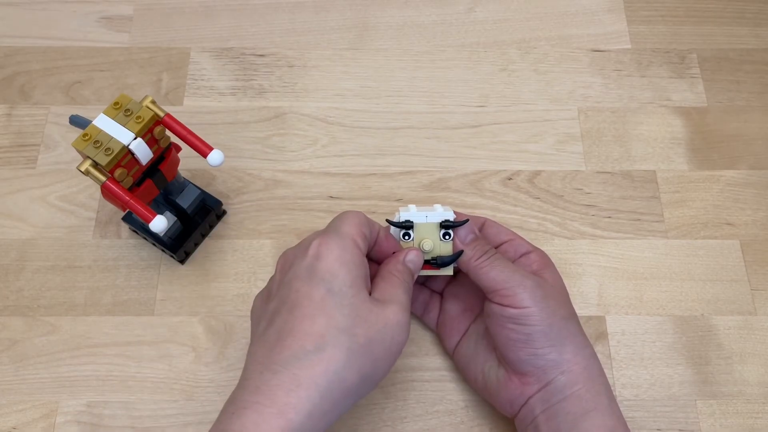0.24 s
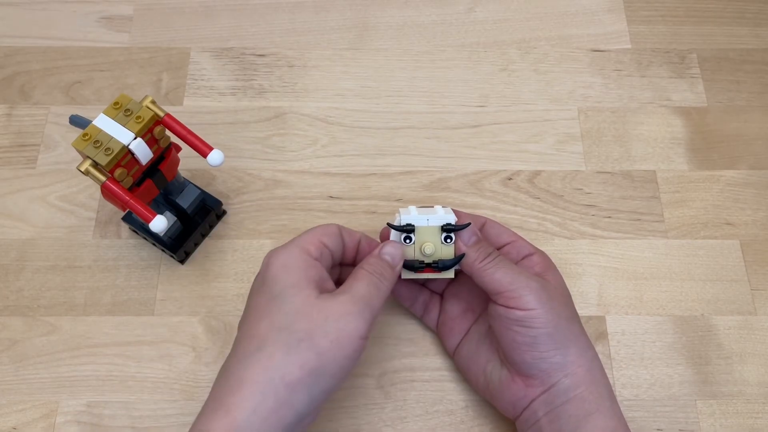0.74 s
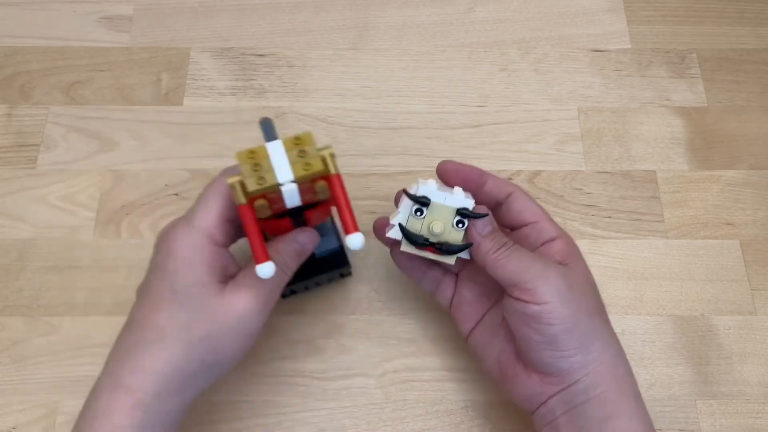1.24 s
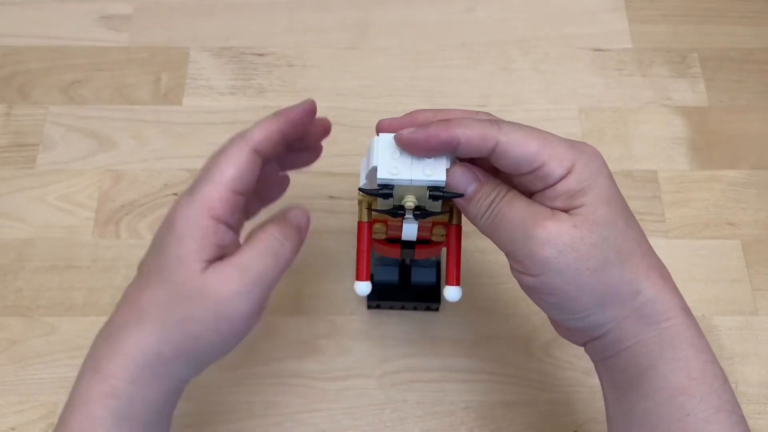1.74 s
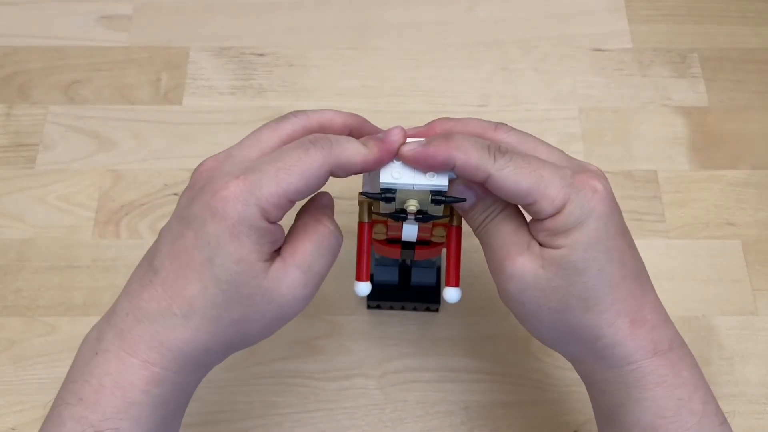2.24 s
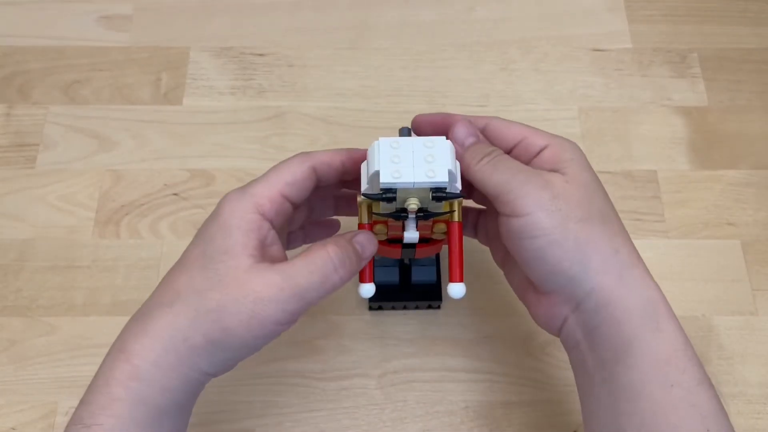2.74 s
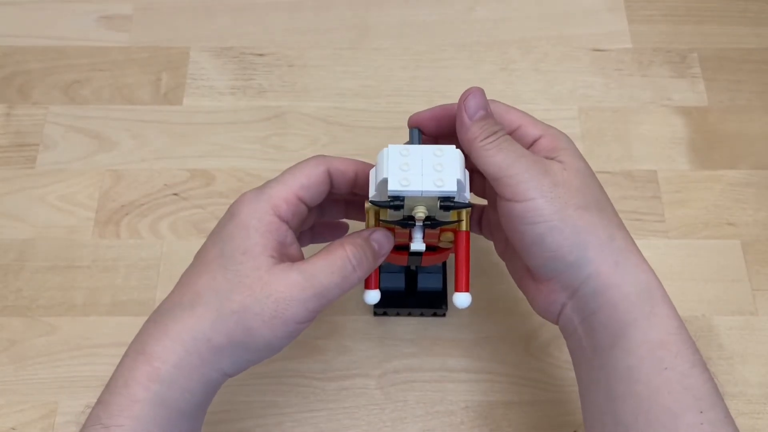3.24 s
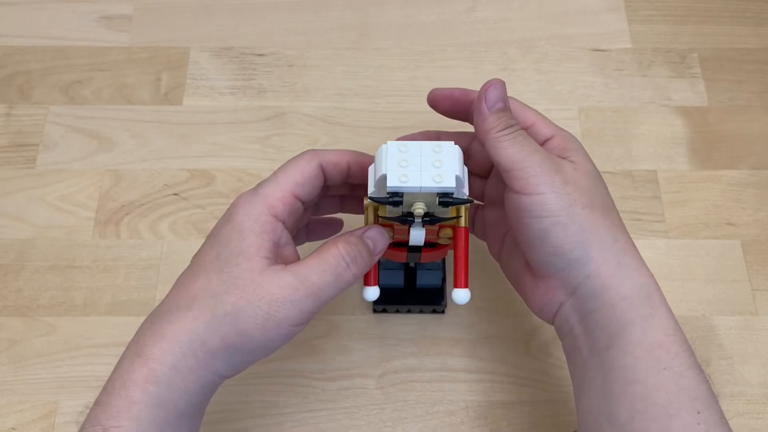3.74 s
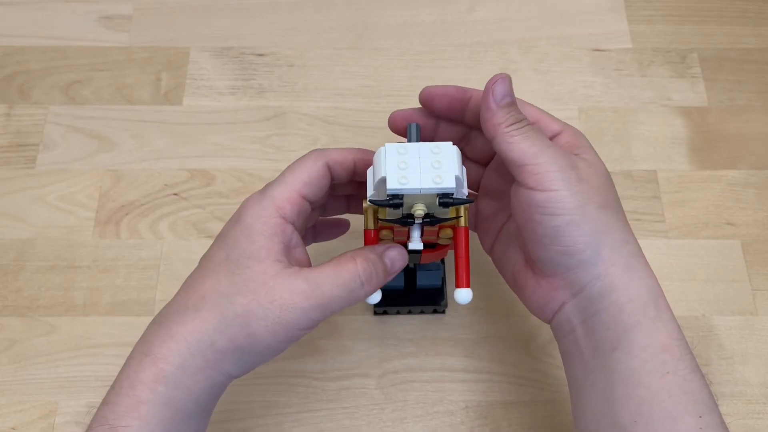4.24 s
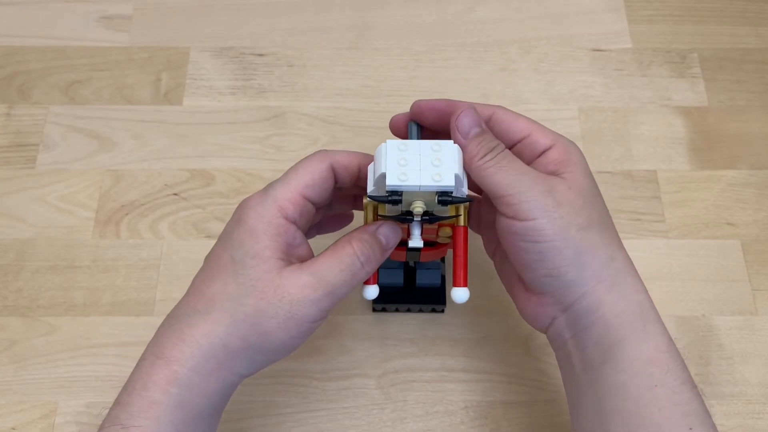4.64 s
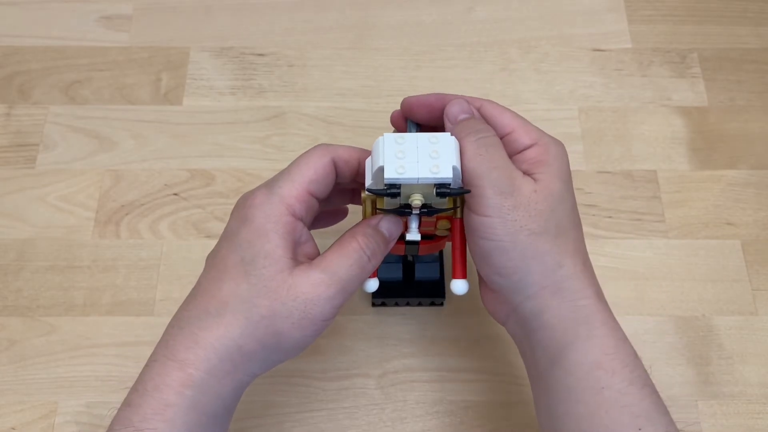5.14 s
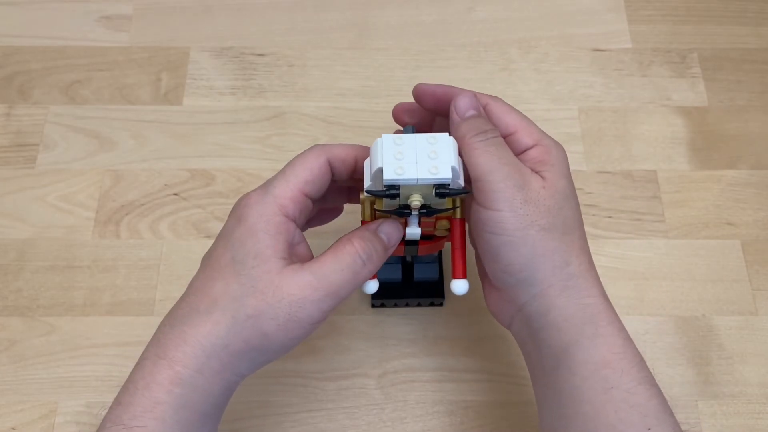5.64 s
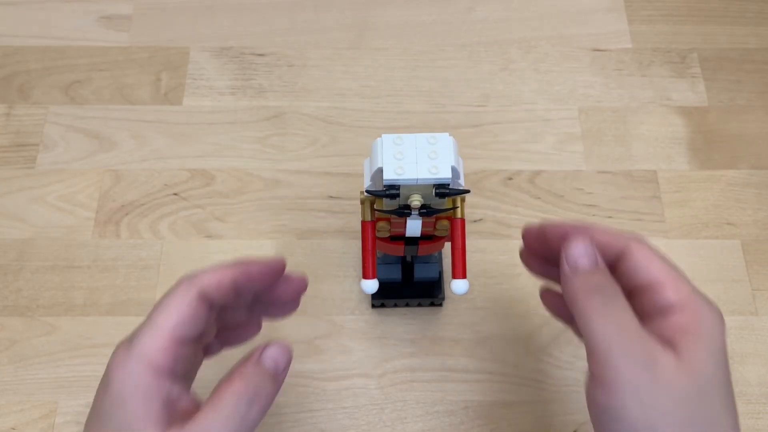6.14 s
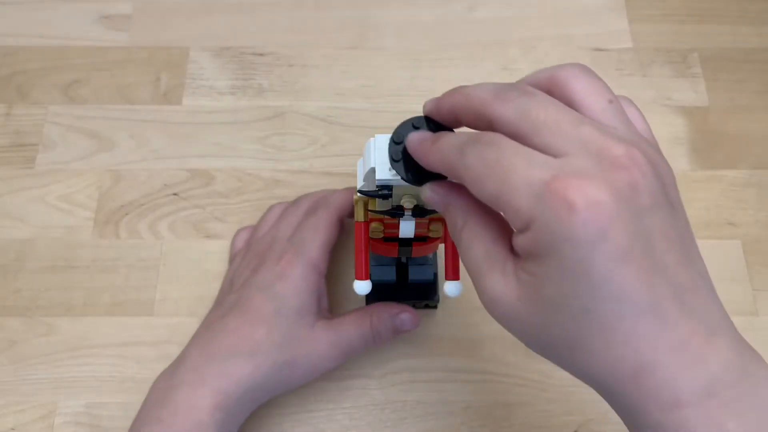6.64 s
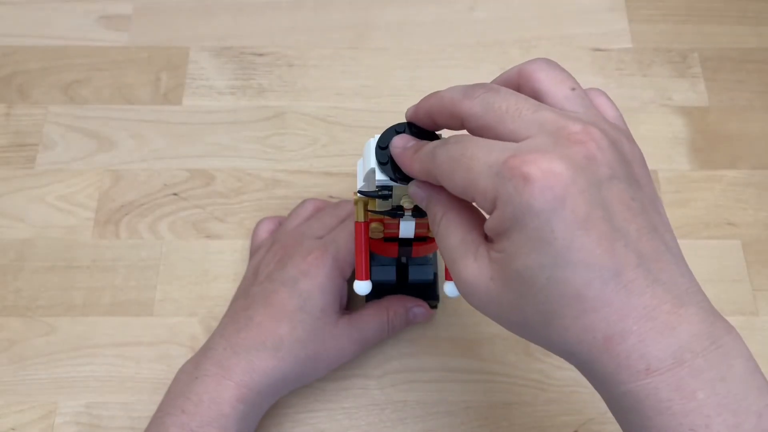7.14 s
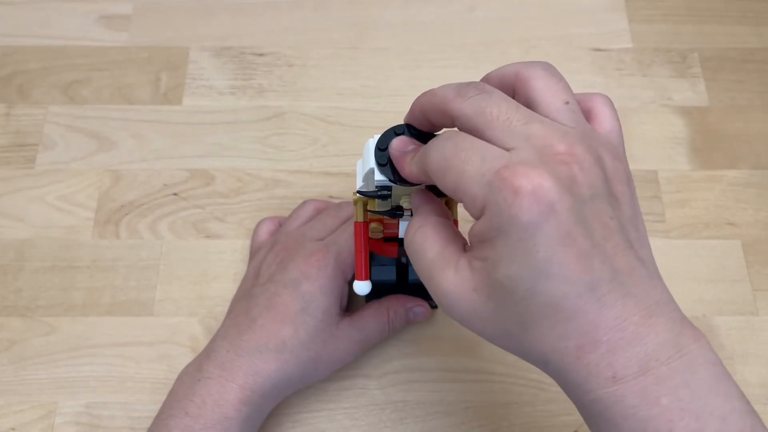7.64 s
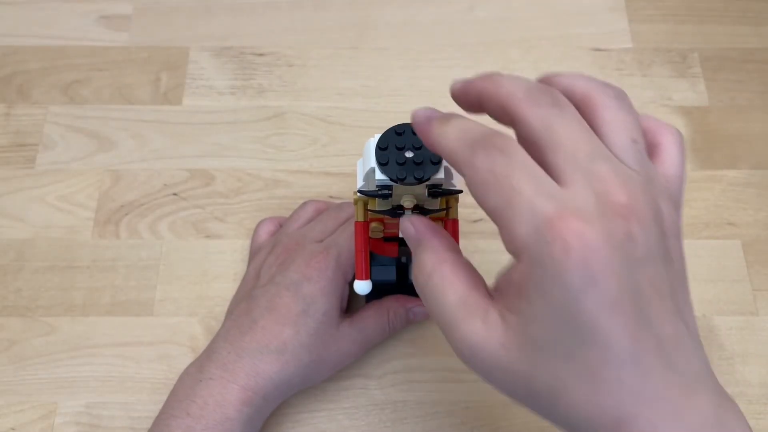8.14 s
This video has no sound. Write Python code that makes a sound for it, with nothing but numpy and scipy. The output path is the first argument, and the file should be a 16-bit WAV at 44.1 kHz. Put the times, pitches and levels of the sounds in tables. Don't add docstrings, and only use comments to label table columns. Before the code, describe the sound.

Hands press hollow plastic bricks together near the microphone. Quiet handling leads to loud cracks with table knocks around two seconds, then sparse light ticks, a short groaning rub of the base, and isolated lever clacks. Later, clustered snaps and thuds seat another piece, ending in tiny finger peels. Faint low rumble and hum lie beneath, dropping slightly between shots.

```python
import sys
import numpy as np
from scipy import signal
from scipy.fft import rfft, irfft, next_fast_len
from scipy.io import wavfile
from scipy.ndimage import uniform_filter1d, map_coordinates

SR = 44100
rng = np.random.default_rng(int(sys.argv[2]) if len(sys.argv) > 2 else 0)


def volts(x):
    e = np.asarray(x, float) / 20
    return 10 ** e


def waveform_to_disk(signal):
    frames = np.transpose(np.atleast_2d(signal))
    scaled = np.clip(frames, -1, 1) * 32767
    samples = np.round(scaled).astype(np.int16)
    wavfile.write(sys.argv[1], SR, samples)


N = 370440

# time in seconds, peak in dB, main ring in Hz,
# ring strength over the crack as a ratio, hardness in dB.
HEAD_SNAPS = [(0.136, -53.5, 3050, 0.81, 2), (0.6413, -51.5, 3750, 1.5, 31), (1.1648, -47.5, 1300, 2.9, 5),
              (1.1725, -61, 5330, 1.5, -2), (1.487, -31, 1070, 5.3, -4), (1.4994, -42.5, 5470, 1.7, -4),
              (1.5165, -39, 3800, 2.5, -20), (1.5504, -41.5, 1440, 1.7, -11), (1.555, -49, 4900, 1.6, 1),
              (1.688, -53, 3500, 2.2, -36), (1.7527, -54.5, 1780, 0.32, -21),
              (1.8585, -49, 1000, 1.6, -11.5), (1.9405, -33, 3780, 0.68, -11),
              (2.0483, -30.5, 2470, 0.4, 5), (2.146, -31, 5530, 0.43, 1.5)]
LEVER_SNAPS = [(2.7417, -51, 1730, 1.3, -15), (2.7554, -56.5, 1860, 2.1, -18),
               (2.876, -46.5, 2270, 0.5, -4), (3.041, -56.5, 2510, 1.2, 8), (3.1786, -53.5, 1280, 2.4, -24),
               (3.8734, -64, 2300, 4.5, -4), (3.8766, -35, 2267, 2.8, 10), (4.5183, -50.5, 2240, 3.9, -2),
               (4.6497, -49.5, 2352, 6.8, -8), (5.5455, -48, 5180, 1.5, -5), (5.7614, -31.5, 2205, 1.3, 1),
               (5.8629, -38.5, 1885, 2.4, -2), (5.9255, -53, 1320, 0.44, 6)]
HAT_SNAPS = [(6.3711, -53.5, 2080, 1.2, -24), (6.456, -51.5, 1280, 0.69, -20),
             (6.8812, -49.5, 1190, 0.9, 12), (6.994, -42, 2275, 6, 3), (7.1336, -32, 1300, 1.25, -1),
             (7.455, -45.5, 1350, 0.19, -2), (7.5211, -41, 2670, 1.3, -3), (7.5263, -41, 2600, 2.1, -22),
             (7.5394, -44.5, 1300, 1, -18), (7.569, -38, 3720, 0.91, 8), (7.5788, -46, 1740, 0.61, -12),
             (7.5921, -45.5, 1670, 0.43, -11), (7.859, -46, 2900, 1.3, 27), (8.037, -46.5, 9000, 1.8, -3),
             (8.074, -55, 1340, 0.34, -19)]
# time in seconds, peak in dB, main ring in Hz.
TICKS = [(0.45, -66, 1340), (0.485, -70, 1090), (0.9248, -61, 1330), (1.6795, -59, 5560),
         (1.826, -63, 1000), (1.8814, -61.5, 3590), (2.2858, -61, 1600), (2.359, -64, 1300),
         (2.4064, -67, 1680), (2.4273, -61, 1270), (2.582, -56.5, 1590), (2.8496, -55.5, 1300),
         (2.9265, -62, 1620), (3.089, -58, 1400), (3.3932, -55, 1830), (3.4812, -58.5, 1570),
         (3.8023, -60.5, 2560), (4.0622, -61.5, 1300), (4.2159, -60, 2410), (4.408, -60, 1620),
         (5.098, -60, 1380), (5.4308, -65, 1300), (5.4918, -61, 1780), (6.891, -56.5, 1220),
         (7.4623, -48, 1630), (7.8828, -57.5, 6640), (8.1195, -58, 1190)]
# time in seconds, peak in dB, main ring in Hz.
PEELS = [
    (8.0514, -60, 4280),
    (8.0874, -58, 3950),
    (8.1755, -61, 4040),
    (8.205, -60, 4100),
    (8.2604, -62, 3270),
    (8.311, -70, 3680),
]
CONTACT_S = [0.0031, 0.0038, 0.003, 0.0029]
RING_T60_S = [.016, .011, .03, .014]
# frequency in Hz, level in dB, t60 in seconds.
FIGURE_MODES = [(954, 14, 0.0013), (1270, -8, 0.015), (1620, -5, 0.037), (1730, -37, 0.0054),
                (2300, -2.5, 0.0038), (2570, 1.5, 0.0083), (3694, 6, 0.0097), (5133, 6.5, 0.0099),
                (6140, -9, .008), (7000, -2.5, 0.0026)]
# time in seconds, peak in dB, mode in Hz, t60 in seconds.
THUDS = [(1.16, -51.5, 209, 0.043), (1.484, -37.5, 145.4, 0.11), (1.546, -30.5, 228, 0.063),
         (1.682, -46.5, 191, 0.064), (1.854, -51, 156, 0.056), (1.937, -30, 264, 0.041),
         (1.939, -45, 795, 0.043), (2.047, -30, 133, 0.042), (2.145, -38.5, 132, 0.069),
         (2.425, -48.5, 134, 0.17), (2.874, -49.5, 304, 0.052), (3.873, -47, 316, 0.15),
         (4.647, -53, 122, 0.1), (5.758, -37.5, 304, 0.058), (5.862, -38.5, 330, 0.042),
         (7.128, -48.5, 294, 0.077), (7.449, -34.5, 225, 0.068), (7.465, -31.5, 144, 0.074),
         (7.521, -54, 156, 0.059), (7.566, -36, 137, 0.064), (7.596, -46, 134, 0.08),
         (8.028, -52, 347, 0.066), (8.075, -56.5, 420, 0.13)]
# frequency in Hz, level in dB, t60 in seconds.
WOOD_MODES = [(290, -6, .08), (415, -8, .07), (660, -12, .04)]
# frequency in Hz, level in dB, t60 in seconds.
HAT_MODES = [(2910, -68, 0.24), (6550, -68, 0.26), (8250, -62, 0.089)]
# peak time in seconds, level
# in dB, brightness in dB, swell in seconds per 20 dB, fade in seconds per 20 dB.
SLIDES = [(0.468, -63.5, -15, 0.035, 0.087), (1.169, -63, -3, 0.0088, 0.029), (1.52, -57.5, 0, 0.047, 0.08),
          (2.58, -75, -15, .012, 0.51), (2.75, -61, -12, .012, 0.032), (2.77, -93, -17, .03, 0.55),
          (3.04, -76, -14, .018, 0.46), (3.186, -74, 9, 0.21, .04), (3.49, -87, 13, .6, 0.093),
          (4.42, -78, -4, .17, .3), (4.67, -78, -25, .15, 0.59), (4.85, -73, -15, 0.13, 0.26),
          (5.562, -71.5, 14, .006, 0.11), (5.782, -72, 14, .01, 0.42), (5.868, -58, -9, 0.021, 0.046),
          (5.89, -64, -17, .03, 0.14), (6.455, -69.5, 13, 0.0075, 0.35), (6.6, -63.5, 3.5, 0.34, 0.15),
          (7.6, -64, 2, .06, 0.11), (7.872, -84.5, 21, .008, 0.35), (8.044, -67.5, 2, 0.018, .28)]
# frequency in Hz, width in Hz, level in dB.
SCRAPE_MODES = [(1188, 120, 1), (2300, 60, 0), (3840, 400, -7), (5670, 120, -7), (6400, 1000, -27),
                (9000, 1400, -3.5)]
# peak time in seconds, level in dB, pitch in Hz,
# swell in seconds per 20 dB, fade in seconds per 20 dB.
JUDDER = [
    (2.6, -61, 400, .03, .04),
    (3.079, -48, 248.5, 0.035, .044),
    (3.16, -38.5, 255.8, 0.017, .05),
    (3.235, -52.5, 252, .06, 0.09),
    (3.335, -55.5, 259, .06, .05),
    (3.485, -56, 313.7, 0.018, .03),
    (3.515, -58, 408, 0.017, .04),
]
# time in seconds, level in dB.
DRAUGHT = [(0.0, -50.5), (0.3, -41), (1.59, -58.5), (1.78, -48), (2.17, -38), (2.39, -51), (2.81, -47),
           (4.89, -40), (4.96, -40), (5.15, -46.5), (5.59, -40.5), (7.0, -49), (8.07, -44), (8.4, -43)]
# low tone in dB, upper tone in dB.
FAN_DB = [(-46, -63.5), (-65, -78.5), (-46, -55), (-47.5, -54)]
SHAFT_HZ = [27.45, 58.7]
# frequency in Hz, density in dB per Hz.
AIR_SPECTRUM = [(20, -22.5), (33, -8.5), (42, -14.5), (55, -13.5), (75, -19.5), (115, -23), (167, -30.5),
                (243, -30.5), (556, -44), (850, -50), (1070, -52), (2260, -57.5), (6490, -59.5),
                (16000, -65.5)]
AIR_DB = [-54.5, -56.5, -53.5, -54]
# frequency in Hz, t60 in seconds.
ROOM_T60 = [(200, 0.56), (1200, 0.48), (4000, 0.47), (12000, 0.095)]
# frequency in Hz, strength in dB.
WET = [(150, -6), (700, -8), (1000, -19.5), (1270, -5.5), (1600, -21), (3500, -18.5), (7000, -11),
       (12000, -19)]
ECHO_DB = [2, 2, 4, 0.5]
ECHO_LASTS = [1.6, 0.4, 0.97, 1.07]
# time in seconds, waveform jump in full scale.
CUTS = [
    (0.895, 0.0066),
    (2.573, -0.00025),
    (6.2965, -0.0085),
]


def unit(x):
    return x / np.sqrt(np.mean(x ** 2) + 1e-20)


def peak(x):
    return x / np.abs(x).max()


def add(out, s, sound):
    out[round(s * SR):][:len(sound)] += sound


def along(points, hz):
    f, v = np.transpose(points)
    return np.interp(np.log(hz + 1), np.log(f + 1), v)


def curve(s, values):
    return np.interp(np.arange(N) / SR, s, values)


def wobble(rate_hz):
    knots = rng.standard_normal(int(N * rate_hz / SR) + 4)
    return map_coordinates(knots, [np.arange(N) * rate_hz / SR])


def bump_db(peak_s, db, swell_s, fade_s, hold_s=0):
    t = np.arange(N) / SR - peak_s
    return db - 20 * np.maximum(np.maximum(-t / swell_s, (t - hold_s) / fade_s), 0)


def tone(hz):
    return np.sin(2 * np.pi * np.cumsum(hz) / SR)


def filtered(x, response):
    m = next_fast_len(len(x) + SR // 2)
    return irfft(rfft(x, m) * response(np.fft.rfftfreq(m, 1 / SR)), m)[:len(x)]


def resonant(modes):
    def response(f):
        return sum((-1) ** k * volts(db) * 1j * f * w / (c * c - f * f + 1j * f * w)
                   for k, (c, w, db) in enumerate(modes))
    return response


def ring(hz, t60, t):
    return volts(-60 * t / t60) * np.sin(2 * np.pi * hz * t)


def shot(s):
    return np.searchsorted(np.transpose(CUTS)[0], s)


def room(x, tail, s):
    hz, t, z = signal.stft(tail, SR, nperseg=256)
    decay_db = 60 * t / along(ROOM_T60, hz)[:, None] / ECHO_LASTS[shot(s)]
    shape = volts(ECHO_DB[shot(s)] + along(WET, hz)[:, None] - decay_db)
    echo = signal.istft(z * shape, SR, nperseg=256)[1][:len(tail)] * np.sqrt(14 / (0.3 * SR))
    first_echo_s = 0.0044
    return signal.fftconvolve(x, np.pad(echo, (round(first_echo_s * SR), 0)))


def reach_db(hz, hard_db):
    tilt = hard_db * np.clip(np.log2((hz + 1) / 1700), 0, 1)
    dulling = 0.99 * min(hard_db + 1, 0) * np.clip(np.log2((hz + 1) / 6000), 0, 2)
    return tilt + dulling


def stud_slips(grit, t, lead_s, contact_s):
    u = np.maximum(t - lead_s, 0) / contact_s
    lead_in = 0.15 * np.exp((t - lead_s) / 0.0024) * (t < lead_s + 0.001)
    rattle = (1 - np.exp(-u / 0.22)) ** 2 * (np.exp(-u) + 0.14 * np.exp(-u / 4))
    return grit * np.abs(grit) * (lead_in + rattle)


def bricks():
    out, t = np.zeros(N + SR), np.arange(round(0.1 * SR)) / SR
    lead_s = 0.012
    ring_top_hz = 2400
    ticks = [(*row, 0.74, -14.5) for row in TICKS]
    peels = [(*row, 0.6, 2) for row in PEELS]
    for s, db, ring_hz, strength, hard_db in HEAD_SNAPS + LEVER_SNAPS + HAT_SNAPS + ticks + peels:
        grit, tail = rng.standard_normal(len(t)), rng.standard_normal(SR // 3)
        levels, pitches = rng.standard_normal((2, len(FIGURE_MODES)))
        slips = stud_slips(grit, t, lead_s, CONTACT_S[shot(s)])

        def crack_response(hz):
            low_cut = (1j * hz / 780 / (1 + 1j * hz / 780)) ** 2
            return volts(reach_db(hz, hard_db)) * low_cut / (1 + 1j * hz / 9000) ** 4.63

        crack = peak(filtered(slips, crack_response))
        high = min(ring_top_hz / ring_hz, 1)
        main_mode = ring(ring_hz, RING_T60_S[shot(s)] * high ** 2, t)
        main = strength * peak(signal.fftconvolve(slips, main_mode)[:len(t)])
        modes = sum(volts(mode_db + reach_db(hz, hard_db) + 2.5 * more) * ring(hz * (1 + 0.02 * pitch), t60, t)
                    for (hz, mode_db, t60), more, pitch in zip(FIGURE_MODES, levels, pitches))
        lesser = 1.72 * peak(signal.fftconvolve(slips, modes)[:len(t)])
        snap = crack + main + lesser
        gain = volts(db + 2.0) / np.abs(snap).max()
        to_walls = crack + 0.3 * high ** 3 * main
        start_s = s - lead_s - 0.001
        add(out, start_s, gain * snap)
        add(out, start_s, room(4.0 * gain * to_walls, tail, s))
    return out[:N]


def table():
    out, t = np.zeros(N + SR), np.arange(SR // 5) / SR
    for s, db, hz, t60 in THUDS:
        levels, tail = rng.standard_normal(len(WOOD_MODES)), rng.standard_normal(SR // 3)
        board = sum(volts(mode_db + 2 * more) * ring(f, decay, t)
                    for (f, mode_db, decay), more in zip(WOOD_MODES, levels))
        thud = volts(db + 0.5) * (1 - np.exp(-t / 0.0024)) * (ring(hz, t60, t) + board)
        add(out, s + 0.002, thud)
        add(out, s + 0.0012, room(thud, tail, s))
    return out[:N]


def hat_plate():
    out, t = np.zeros(N + SR), np.arange(SR // 3) / SR
    flick_s = 7.859
    add(out, flick_s, sum(volts(db) * ring(hz, t60, t) for hz, db, t60 in HAT_MODES))
    return out[:N] * volts(6.7 * wobble(150))


def sliding():
    def dull_response(hz):
        return (hz / 700) ** 2 / (1 + (hz / 700) ** 2) / (1 + (hz / 3000) ** 4)

    def sharp_response(hz):
        return 1 / (1 + (3000 / (hz + 1)) ** 4) / np.sqrt(1 + (hz / 8000) ** 6.0)

    grains = rng.standard_normal(N) * volts(1.8 * wobble(45) + 1.5 * wobble(300))
    rub = filtered(grains, lambda hz: resonant(SCRAPE_MODES)(hz) + volts(-8.5))
    dull, sharp = unit(filtered(rub, dull_response)), unit(filtered(rub, sharp_response))
    out = np.zeros(N)
    for s, db, bright_db, swell_s, fade_s in SLIDES:
        out += volts(bump_db(s, db, swell_s, fade_s) - 5.0) * (dull + volts(bright_db - 7.5) * sharp)
    return out


def judder():
    level_db = np.max([bump_db(s, db, swell_s, fade_s) for s, db, _, swell_s, fade_s in JUDDER], axis=0)
    hz = curve([row[0] for row in JUDDER], [row[2] for row in JUDDER])
    throb = volts(level_db + 2.5 * wobble(40)) * tone(hz * (1 + 0.035 * wobble(70)))
    grains = rng.standard_normal(N) * volts(1.3 * wobble(120))
    base_modes = [(330, 49, 4.0), (664, 65, 2.5), (1000, 170, -0.5), (1300, 320, -3)]  # Hz, width Hz, dB
    rub = unit(filtered(grains, resonant(base_modes)))
    pressure = np.sqrt(np.abs(uniform_filter1d(volts(2 * level_db), size=3500)))
    return throb + volts(-14.5) * pressure * rub


def stand():
    sway_db = bump_db(1.741, -36.5, swell_s=0.068, fade_s=0.27, hold_s=0.39)
    sway_hz = 16.1 * (1 + 0.0627 * wobble(3.6))
    sway = volts(sway_db) * tone(sway_hz)
    drift_db = curve(*np.transpose(DRAUGHT)) + 0.5
    drift = volts(drift_db) * tone(12 * volts(3.6 * wobble(5.9)))
    still = np.clip((-55 - uniform_filter1d(sway_db, 2000)) / 15, 0, 1)
    return np.sqrt(2) * (sway + drift * still)


def hum():
    by_sample = np.array(FAN_DB, float)[shot(np.arange(N) / SR)].T
    levels_db = uniform_filter1d(by_sample, size=200, axis=1)
    drift = 1 + 0.006 * wobble(3)
    return np.sqrt(2) * sum(volts(db + 2.66 * wobble(4)) * tone(hz * drift)
                            for db, hz in zip(levels_db, SHAFT_HZ))


def air():
    noise = unit(filtered(rng.standard_normal(N), lambda hz: volts(along(AIR_SPECTRUM, hz))))
    return volts(np.array(AIR_DB)[shot(np.arange(N) / SR)] + 0.23 * wobble(3.3)) * noise


def scene():
    handled = bricks() + table() + hat_plate() + sliding() + judder()
    return (handled + stand() + hum() + air())[None]


def top_cut(x):
    return signal.sosfilt(signal.butter(12, 16410, fs=SR, output="sos"), x)


def record(dry):
    t = np.arange(N) / SR
    since_s = t - CUTS[0][0]
    fade_in = np.clip((since_s - 0.012) / 0.02, 0, 1) ** 2
    x = dry[0] * np.where(since_s < 0, 1, fade_in)
    x += (-0.01 - x[0]) * np.exp(-t / 0.021)
    for s, jump in CUTS:
        k = int(s * SR) + 1
        x[:k] += (x[k] - x[k - 1] - jump) * np.exp((t[:k] - s) / 0.017)
    top_hz = 15750
    mix = filtered(x, lambda hz: hz < top_hz)[None]
    return top_cut(mix)


dry = scene()
out = record(dry)
waveform_to_disk(out)
```